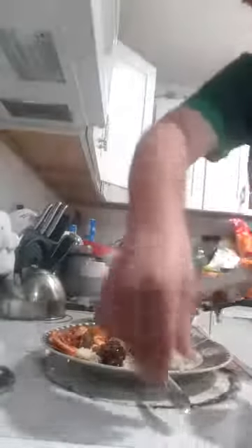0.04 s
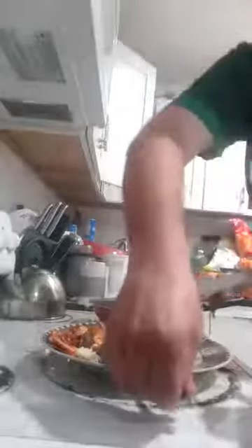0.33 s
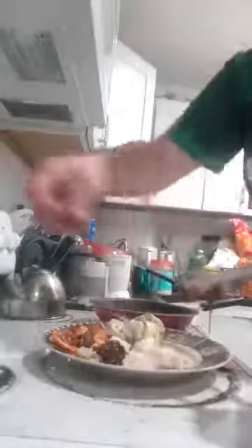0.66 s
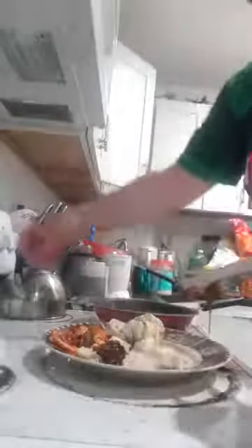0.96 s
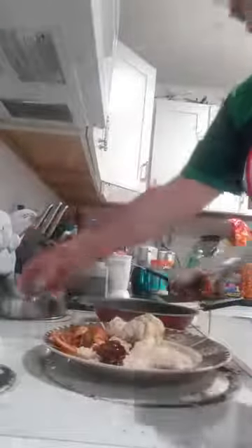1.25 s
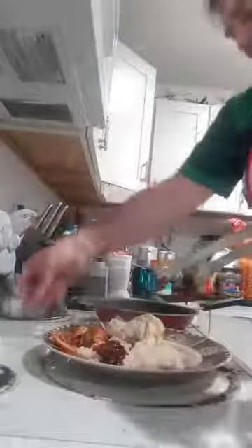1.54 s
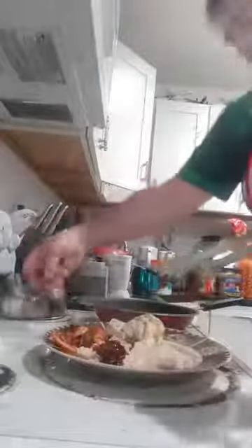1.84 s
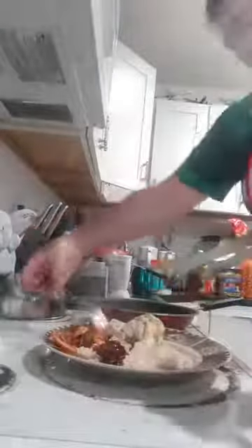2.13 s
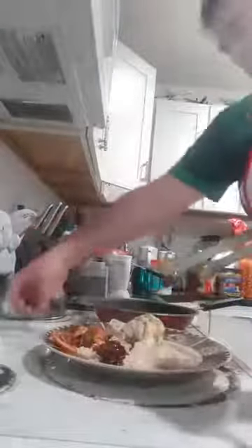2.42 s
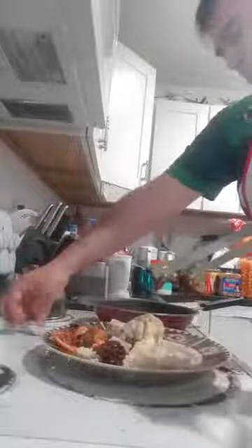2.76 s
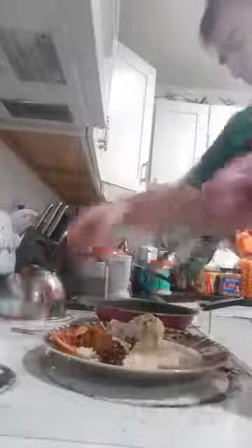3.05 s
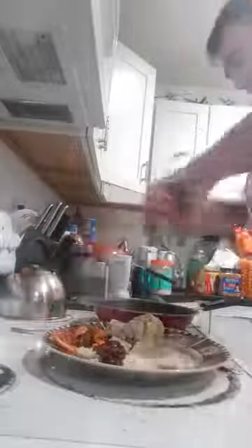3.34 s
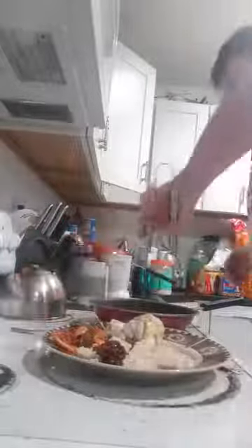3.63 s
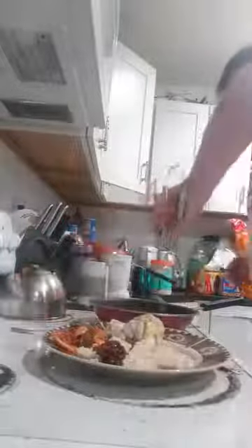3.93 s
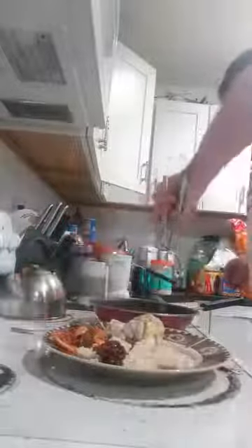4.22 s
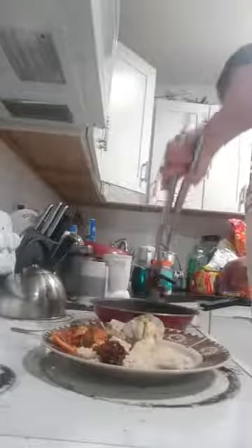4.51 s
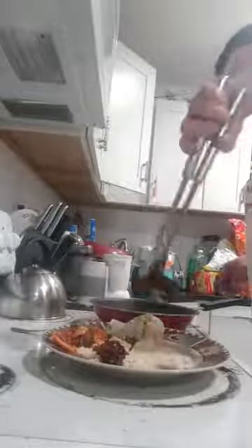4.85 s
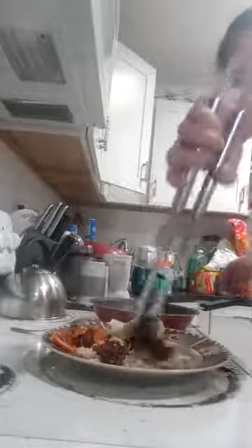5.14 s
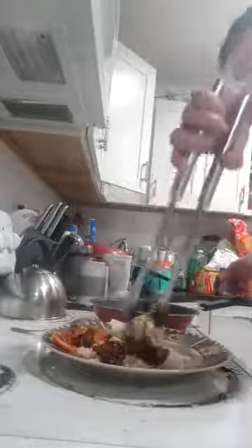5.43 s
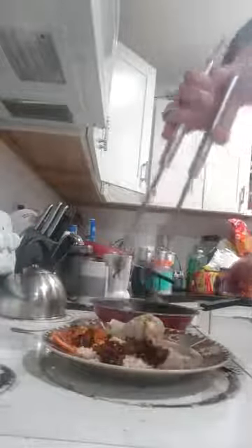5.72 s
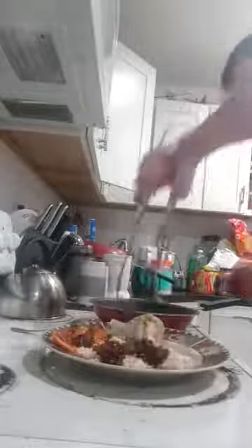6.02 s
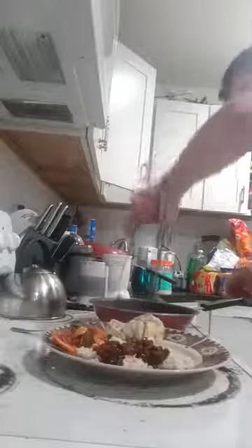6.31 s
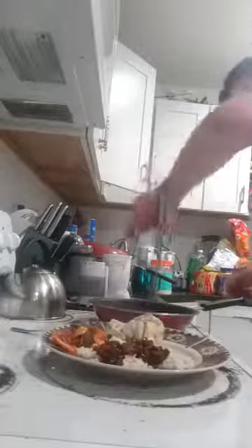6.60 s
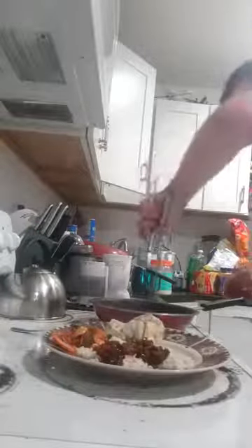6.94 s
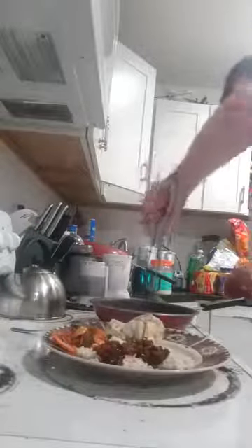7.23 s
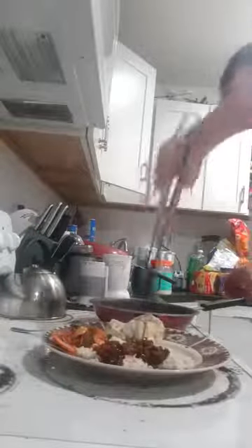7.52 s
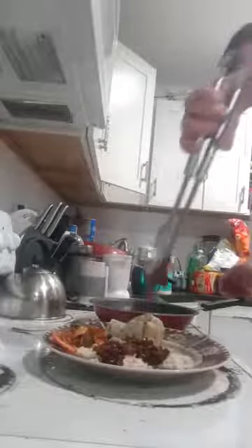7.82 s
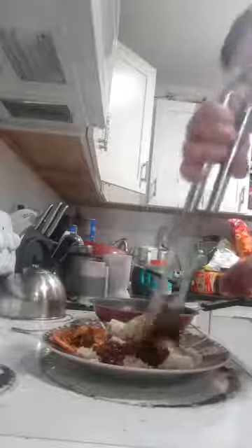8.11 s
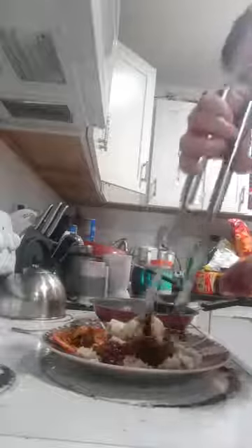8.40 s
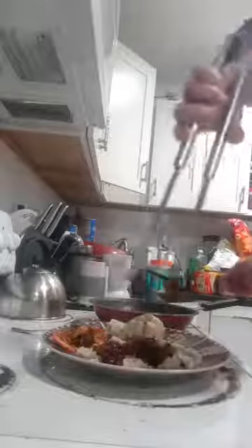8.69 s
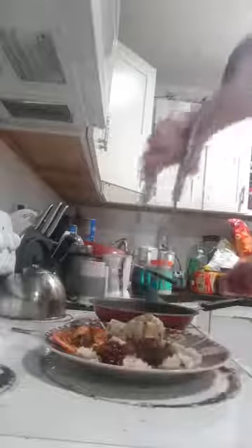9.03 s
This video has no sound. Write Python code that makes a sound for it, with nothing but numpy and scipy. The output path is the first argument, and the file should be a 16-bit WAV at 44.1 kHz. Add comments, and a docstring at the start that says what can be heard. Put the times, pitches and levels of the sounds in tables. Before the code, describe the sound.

Food sizzles softly in a kitchen while a metal fork clinks and clatters down, and tongs knock against a frying pan.

```python
"""Beef frying in a small kitchen

Steam bubbles burst and fat spits in a pan, over mains hum and the room's rush. A steel fork clinks,
then drops clattering on the worktop; tongs knock and shove the pan on the hob and tick as they carry
the meat over. A phone's automatic gain ducks at each loud hit, waits and swells back."""
import sys
import numpy as np
from scipy import signal
from scipy.fft import rfft, irfft, next_fast_len
from scipy.io import wavfile
from scipy.ndimage import uniform_filter1d, minimum_filter1d

SR = 44100
rng = np.random.default_rng(int(sys.argv[2]) if len(sys.argv) > 2 else 0)


def store_wav(level_fs):
    """Save 16-bit WAV to argv[1]."""
    pcm = np.round(np.clip(np.atleast_2d(level_fs), -1, 1) * 32767)
    wavfile.write(sys.argv[1], SR, pcm.T.astype(np.int16))


N = 403956
TIME = np.arange(N) / SR
AGE = TIME[:SR // 2]  # seconds since a contact


def undb(db):
    """Decibels to gain."""
    return 10 ** (np.asarray(db) / 20)


def fader(rows):
    """Gain over time from rows of t/s, level/dB."""
    return undb(np.interp(TIME, *np.transpose(rows)))


def unit_rms(x):
    """Scale to an rms of 1."""
    return x / np.sqrt(np.mean(x ** 2))


def hit_at(x, db):
    """Scale a short sound to the energy of 10 ms at this level."""
    return x * undb(db) * np.sqrt(.01 * SR / np.sum(x ** 2))


def place(track, start_s, x):
    """Mix a sound into the track."""
    i = int(start_s * SR)
    track[i:i + len(x)] += x[:N - i]


def wander(points):
    """A slow drift through evenly spaced random points."""
    return np.interp(TIME, np.linspace(0, TIME[-1], points), rng.standard_normal(points))


def eq(x, points, tilt_db=0):
    """Filter through points of f/Hz, level/dB, tilted by tilt_db per octave."""
    size = 2 * next_fast_len(len(x))
    octave = np.log2(np.maximum(np.arange(size // 2 + 1) * SR / size, 1))
    hz, db = np.transpose(points)
    slope_db = tilt_db * np.clip(octave, np.log2(hz[0]), np.log2(hz[-1]))
    response = undb(np.interp(octave, np.log2(hz), db) + slope_db)
    # minimum phase: nothing rings ahead of an attack
    cepstrum = irfft(np.log(response))
    cepstrum[1:size // 2] *= 2
    cepstrum[size // 2 + 1:] = 0
    return irfft(rfft(x, size) * np.exp(rfft(cepstrum)))[:len(x)]


def accent(x, hz, db, octaves):
    """The point of contact boosts or starves one band, reaching some octaves to each side."""
    edges = hz * 2 ** (octaves * np.array([-1, -1 / 3, 1 / 3, 1]))
    return eq(x, np.transpose([edges, [0, db, db, 0]]))


def grains(size, per_s, spread_db):
    """Random tiny impacts; a positive spread makes a few stand out, a negative one sinks a few."""
    strength = undb(spread_db * np.minimum(rng.exponential(size=size), 6))
    return (rng.random(size) < per_s / SR) * rng.choice([-1, 1], size) * strength


def contact(chatter_s, snap_db):
    """A sharp first snap and the dying chatter that follows it."""
    chatter = grains(len(AGE), per_s=12000, spread_db=-2.0) * np.exp(-AGE / chatter_s)
    return hit_at(chatter, 0) + hit_at(1. * (AGE == 0), snap_db)


def ring(modes, tilt_db, swell_s):
    """Damped modes that build up while the contact lasts, a little differently at each hit."""
    hz, db, t60 = np.transpose(modes)[:, :, None]
    gain = undb(db + tilt_db * np.log2(hz) + 1.3 * rng.standard_normal(hz.shape))
    detune = 1 + 0.0026 * rng.standard_normal(hz.shape)
    phase = 2 * np.pi * (hz * detune * AGE + rng.random(hz.shape))
    # each mode has a weaker twin close by, so the ring beats
    twins = np.sin(phase) + .5 * np.sin(phase * (1 + 0.0027 * rng.standard_normal(hz.shape)))
    decay = np.exp(-np.log(1000) * AGE / t60)
    return np.sum(gain * twins * decay, axis=0) * (1 - np.exp(-AGE / swell_s))


# Partials of the hum: multiple of the mains frequency, level/dB
HUM_PARTIALS = [(1, 3.5), (2, -17.5), (3, -32), (6, -22.5)]


def mains_hum(mains_hz=59.33, level_db=-32.5):
    """A low bed of mains harmonics, barely wavering in level."""
    hum = sum(undb(db) * np.sin(2 * np.pi * (k * mains_hz * TIME + rng.random()))
              for k, db in HUM_PARTIALS)
    return unit_rms(hum) * undb(level_db + 0.16 * wander(points=90))


# Slow fader ride shared by room tone, sizzle and spits: t/s, level/dB
BED_RIDE = [(0, -42.5), (1.5, -42.5), (2.3, -42.5), (3.2, -40.5), (5.2, -41.5), (6.6, -45), (7.5, -47),
            (9.16, -47.5)]
# Colour of the room tone: f/Hz, level/dB
ROOM_TONE_EQ = [(30, -3.5), (90, 4), (170, 0.5), (270, -5.5), (370, -6.5), (560, -2.5), (760, -12.5),
                (980, -13.5), (1170, 0.5), (1330, 2), (1490, -15.5), (2100, -17), (5000, -33)]


def room_tone():
    """The soft, dark rush of the kitchen."""
    rush = eq(rng.standard_normal(N), ROOM_TONE_EQ) * undb(1.2 * wander(points=110))
    return unit_rms(rush) * fader(BED_RIDE) * undb(2.06)


# Bright colour of frying fat: f/Hz, level/dB
FAT_EQ = [(1200, -3), (2100, -15.5), (2520, -3.5), (3100, -12.5), (3400, -7), (3900, -10), (4600, -6),
          (5600, -6), (6400, -2.5), (7500, 0.5), (8300, -10.5), (9700, -8.5), (11400, -5), (14300, -16)]


def sizzle():
    """Countless steam bubbles burst in the fat, in small flurries."""
    bubbles = unit_rms(grains(N, per_s=7000, spread_db=2.5))
    hiss = undb(2.0) * rng.standard_normal(N)
    flurries = undb(0.76 * wander(points=200))
    return unit_rms(eq((bubbles + hiss) * flurries, FAT_EQ)) * fader(BED_RIDE) * undb(1.37)


def spits():
    """Drops of fat spit, a sparser, brighter crackle on top of the sizzle."""
    pops = grains(N, per_s=35, spread_db=2.5)
    drops = signal.fftconvolve(pops, contact(chatter_s=.005, snap_db=-7))[:N]
    return unit_rms(eq(drops, FAT_EQ, tilt_db=1.0)) * fader(BED_RIDE) * undb(-8.5)


# Cues for tong ticks, single spits and soft plops of meat: t/s, level/dB, f/Hz
TICK_CUES = [(1.303, -33, 550), (1.949, -37.5, 9200), (3.21, -31.5, 8600), (4.154, -35, 6540),
             (5.421, -38.5, 4800), (5.604, -33, 7600), (5.609, -35.5, 535), (6.66, -36, 7600),
             (7.337, -40, 7250), (8.49, -43, 10100)]


def ticks():
    """Light touches, each a short crackle around its own pitch."""
    out = np.zeros(N)
    for start_s, db, hz in TICK_CUES:
        band = [(hz / 4, -20), (hz * 0.69, -7), (hz, 0), (hz * 1.15, -7), (hz * 5, -28)]
        tick = eq(contact(chatter_s=0.015, snap_db=-13), band)
        place(out, start_s, hit_at(tick, db))
    return out


# Low body of the hob, under scrapes and knocks: f/Hz, level/dB
HOB_EQ = [(40, -16), (190, -1.5), (260, -2.5), (325, 6), (410, -8), (485, 3), (600, -9), (830, -8),
          (1000, -11.5), (1220, -2.5), (1370, -12), (1520, -28), (7000, -42), (14000, -48)]
# Scrape cues: t/s, rise/s, fall/s, level/dB, tilt/(dB per octave)
SCRAPE_CUES = [(1.27, 0.084, 0.18, -42.5, 6), (1.71, 0.022, 0.077, -33.5, 5.5),
               (3.654, .012, 0.19, -24, 3.5), (6.595, 0.052, 0.061, -27.5, 0.5),
               (6.66, 0.071, .075, -30.5, -3), (6.961, 0.087, 0.053, -36.5, -3.5)]


def scrapes():
    """Things shoved over the hob and worktop stick and slip, swelling and fading with the push."""
    out = np.zeros(N)
    for start_s, rise_s, fall_s, db, tilt_db in SCRAPE_CUES:
        push = np.interp(AGE, [0, rise_s, rise_s + fall_s], [0, 1, 0])
        slips = eq(grains(len(AGE), per_s=1200, spread_db=1.5), HOB_EQ, tilt_db)
        place(out, start_s, undb(db) * push * unit_rms(slips))
    return out


# Dull clack of the pan: f/Hz, level/dB
PAN_EQ = [(40, -54), (160, -9), (330, -4.5), (520, -4.5), (720, -3), (980, -17.5), (1200, 3.5), (1380, -2),
          (1580, -14), (2000, -18), (3500, -28), (5500, -35), (7000, -28.5), (12000, -70)]
# Short ring of the pan: f/Hz, level/dB, t60/s
PAN_RING = [(683, -12.5, 0.052), (890, -4.5, 0.029), (1155, -3.5, 0.017), (1315, 9, 0.019),
            (1550, -8, 0.0071), (1940, -22, 0.038), (2190, -27, 0.12), (2460, -46, 0.043),
            (3360, -24.5, 0.038)]
# Knock cues: t/s, level/dB, rumble send/dB, tilt/(dB per octave), chatter/s, accent f/Hz, accent/dB
KNOCK_CUES = [(3.5214, -5, -13.5, 1.55, 0.0028, 980, 2.5), (6.148, -39, -5.5, 3.5, .008, 1320, 9),
              (6.3149, -22.5, -2, 1, .0098, 2190, 6), (6.394, -21, -0.5, 0.5, 0.0022, 4050, -4),
              (6.654, -39, 4, 3, .006, 1410, 7.5)]


def pan_knocks():
    """Tongs knock the pan: it clacks, rings briefly and shakes the hob."""
    out = np.zeros(N)
    for start_s, db, rumble_db, tilt_db, chatter_s, accent_hz, accent_db in KNOCK_CUES:
        clack = eq(contact(chatter_s, snap_db=-7.0), PAN_EQ, tilt_db)
        tone = ring(PAN_RING, tilt_db, swell_s=.0009)
        rumble = eq(contact(chatter_s=0.05, snap_db=-20), HOB_EQ, tilt_db=-3.1)
        knock = hit_at(clack, db) + hit_at(tone, db - 4)
        place(out, start_s, accent(knock, accent_hz, accent_db, octaves=0.56))
        place(out, start_s, hit_at(rumble, db + rumble_db))
    return out


# Bright clack of steel: f/Hz, level/dB
STEEL_EQ = [(60, -47), (1000, -4), (1720, -17), (2030, -19), (2450, 0.5), (3400, -9.5), (4700, -8),
            (5350, -6), (5950, 3.5), (7400, 2.5), (8700, -1.5), (10000, -1.5), (11700, 0.5), (14300, -7.5)]
# Thud of the worktop: f/Hz, level/dB
WORKTOP_EQ = [(55, -44), (105, -7), (170, -6.5), (290, -16), (470, -4.5), (620, -8.5), (780, -12),
              (980, -15.5), (1180, 4), (1350, -3), (1500, -7), (1900, -15), (3000, -44.5)]
# Ring of the fork: f/Hz, level/dB, t60/s
FORK_RING = [(1165, -7, .12), (1650, -4, .05), (1760, 2, .11), (2380, -14, .15), (3118, -15, .24),
             (3335, -11, .08), (3945, -17, .16), (4826, -2, .16), (5780, 0, .16), (6100, -6, .11),
             (6840, -5, .21), (7200, -4, .12), (7660, -5, .08), (8028, 5, .17), (8235, -7, .1),
             (8530, -12, .18), (9270, -11, .25), (10470, -9, .1), (11060, -10, .12), (11250, -10, .14),
             (11590, -9, .17), (11800, -9, .15), (12550, -13, .15)]
# Fork cues: t/s, level/dB, ring over clack/dB, tip (0 flat, 1 tine tips only), chatter/s, accent f/Hz
FORK_CUES = [(1.0369, -13.5, 5.5, 0.014, 0.01, 2960), (1.732, -41, 1, 0.64, 0.036, 4320),
             (2.296, -20, -9, 0.95, 0.0079, 12000), (2.2973, -28.5, -2.5, .6, 0.0031, 6100),
             (2.331, -25.5, -9, 0.82, 0.025, 11500), (2.35, -25.5, -5, 0.74, 0.011, 7000),
             (2.511, -31.5, 0.5, 0.61, 0.035, 12000), (2.557, -28, -3, .7, 0.026, 7500),
             (2.578, -15.5, -5, 0.21, .0097, 3300), (2.586, -18.5, -18, 0.86, 0.0087, 3600),
             (2.764, -2.5, -5.5, 0.69, 0.015, 3620), (2.781, -4, -17, 0.51, 0.049, 3100),
             (2.81, -7, -3, .5, .012, 1760), (2.822, -1.5, -10.5, 0.54, 0.032, 3500),
             (2.832, -6, -1, 0.66, 0.015, 11700), (2.875, -25, -1, 0.52, .031, 1800)]


def fork(held_until_s=2.4):
    """Each contact clacks, rings the fork and thuds in the worktop."""
    out = np.zeros(N)
    for start_s, db, ring_db, tip, chatter_s, accent_hz in FORK_CUES:
        # a flat landing is damped and thuds; the tine tips sound thin and pitched
        accent_db = np.interp(tip, [0, 1], [-11.5, 21])
        thud_db = np.interp(tip, [0, 1], [1.5, -13.5])
        hand_db = 11 * (start_s < held_until_s)  # the hand's weight deepens the thud
        clack = eq(contact(chatter_s, snap_db=-11.5), STEEL_EQ, tilt_db=-0.6)
        tone = ring(FORK_RING, tilt_db=0.45, swell_s=0.00085)
        thud = hit_at(eq(contact(chatter_s, snap_db=-16.0), WORKTOP_EQ), db + thud_db)
        place(out, start_s, hit_at(accent(clack, accent_hz, accent_db, octaves=0.45), db))
        place(out, start_s, hit_at(accent(tone, accent_hz, accent_db, octaves=0.29), db + ring_db))
        place(out, start_s, accent(thud, hz=142, db=hand_db, octaves=0.53))
    return out


def room_reverb(x, t60_s, wet_db):
    """Cupboards and walls return a short, diffuse tail."""
    tail = rng.standard_normal(len(AGE)) * np.exp(-np.log(1000) * AGE / t60_s) * (AGE > .005)
    return x + undb(wet_db) * signal.fftconvolve(x, tail / np.sqrt(np.sum(tail ** 2)))[:N]


def auto_gain(x, ceiling_db=-13, attack_s=0.00054, hold_s=1.42, release_db_per_s=7.5, start_cut_db=9):
    """Duck by as much as the level passes the ceiling, hold, then swell back at a steady rate."""
    power = uniform_filter1d(x ** 2, SR // 100)
    level_db = 10 * np.log10(np.maximum(power, 1e-12))
    duck_db = np.minimum(ceiling_db - level_db, 0)
    half_hold = int(hold_s * SR / 2)
    cut_db = -minimum_filter1d(duck_db, 2 * half_hold + 1, origin=half_hold, mode="constant")
    cut_db[0] = start_cut_db
    release_db = release_db_per_s * TIME
    cut_db = np.maximum.accumulate(cut_db + release_db) - release_db
    pole = np.exp(-1 / (attack_s * SR))
    smooth_cut_db, _ = signal.lfilter([1 - pole], [1, -pole], cut_db, zi=[start_cut_db])
    return x * undb(-smooth_cut_db)


def scene():
    """Fork, pan and tongs in a tight room, over a bed of frying, room tone and hum."""
    handling = room_reverb(fork() + pan_knocks() + scrapes() + ticks(), t60_s=0.19, wet_db=-10)
    return (handling + sizzle() + spits() + room_tone() + mains_hum())[None]


def record(dry):
    """The phone rides its gain, soft-clips the loudest peaks and cuts the top."""
    rounded = np.tanh(1.057 * auto_gain(dry[0])) / 1.165
    high_cut = signal.ellip(10, .2, 70, 14450, fs=SR, output="sos")
    return signal.sosfilt(high_cut, rounded)[None]


dry = scene()
out = record(dry)
store_wav(out)
```